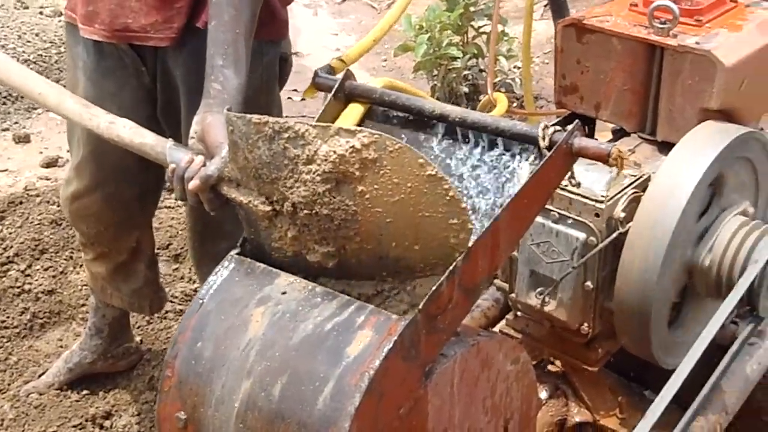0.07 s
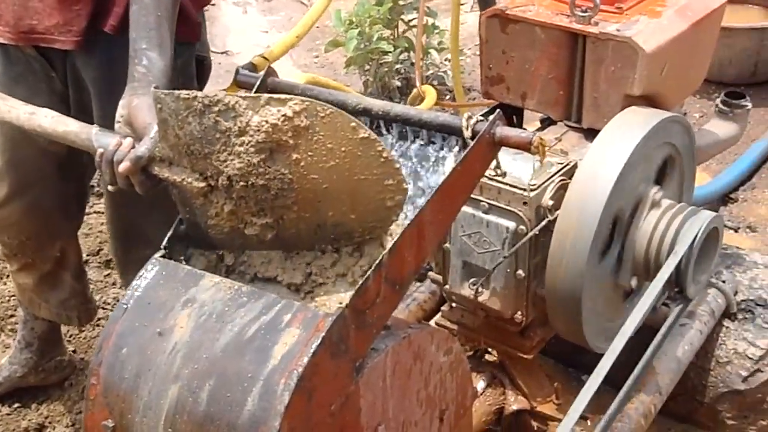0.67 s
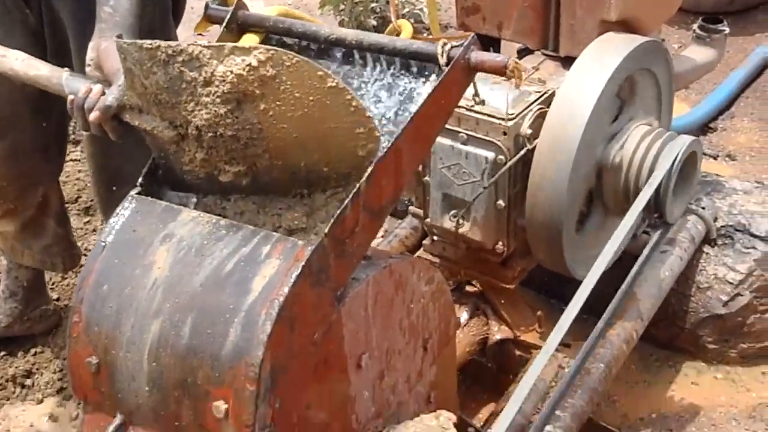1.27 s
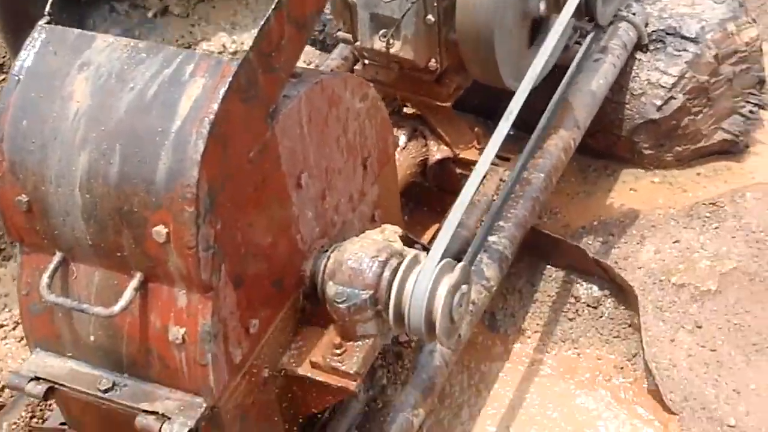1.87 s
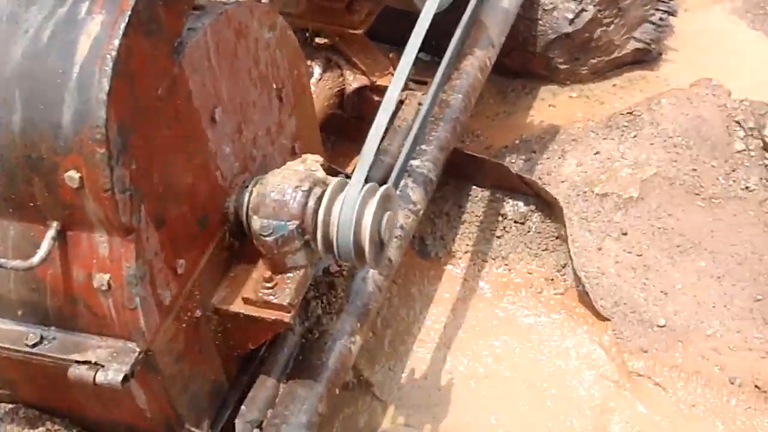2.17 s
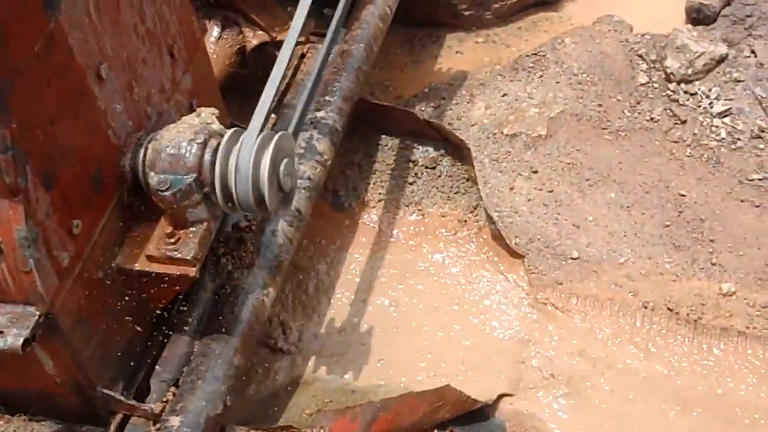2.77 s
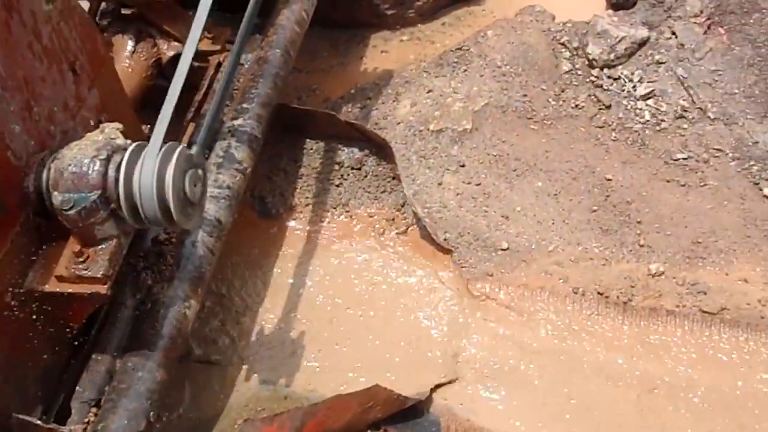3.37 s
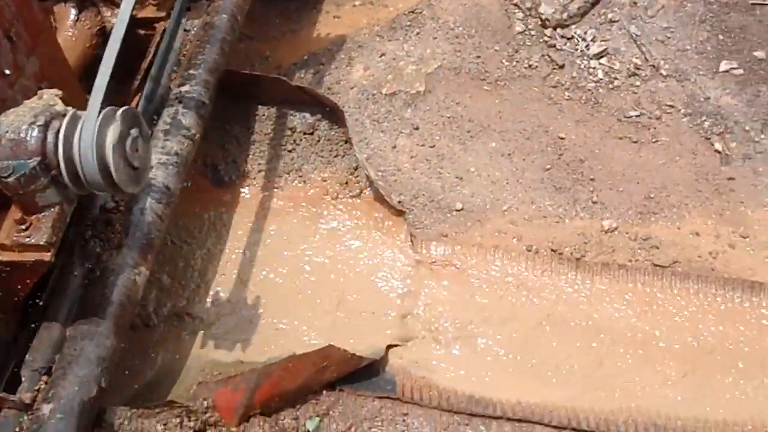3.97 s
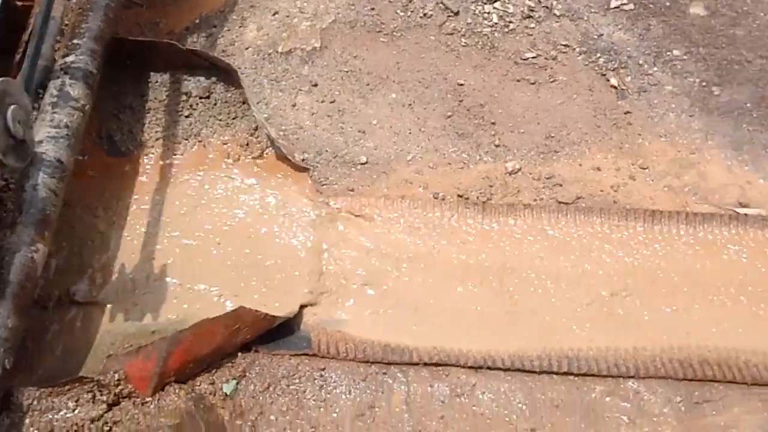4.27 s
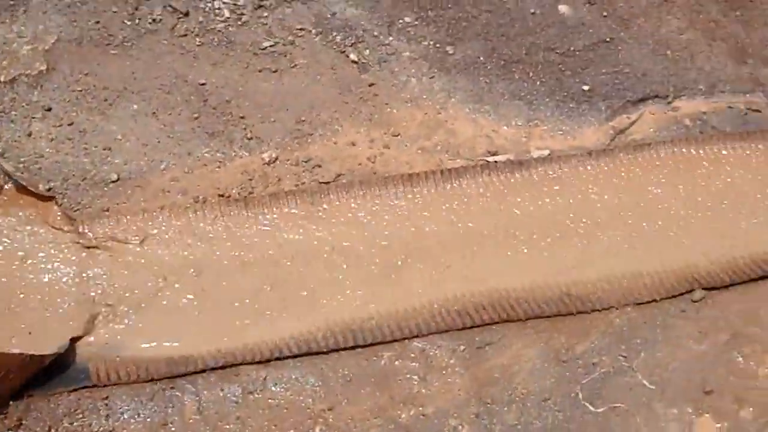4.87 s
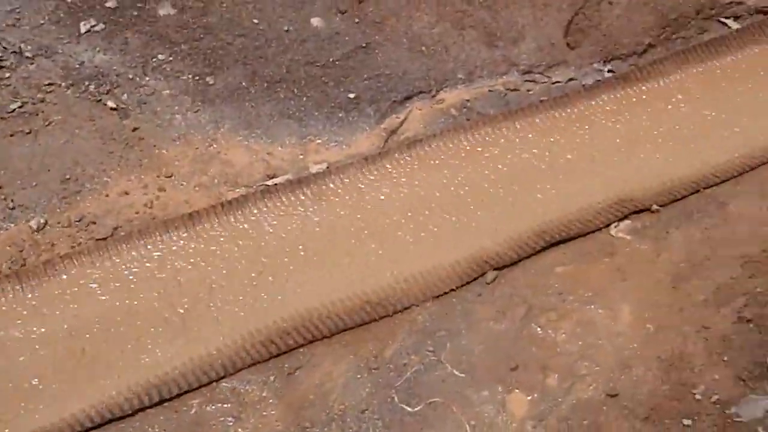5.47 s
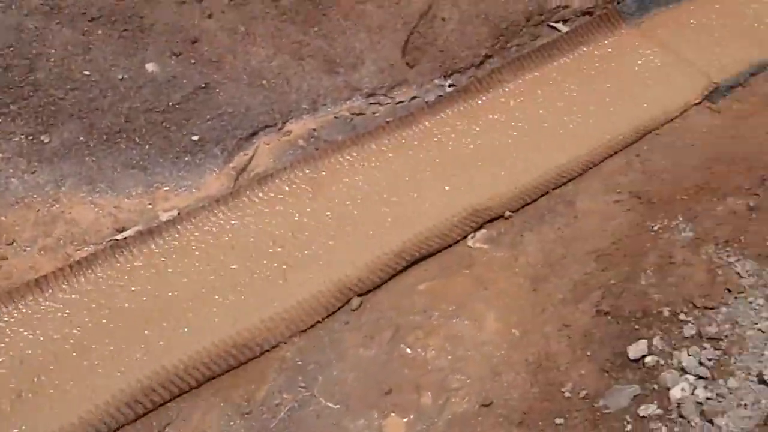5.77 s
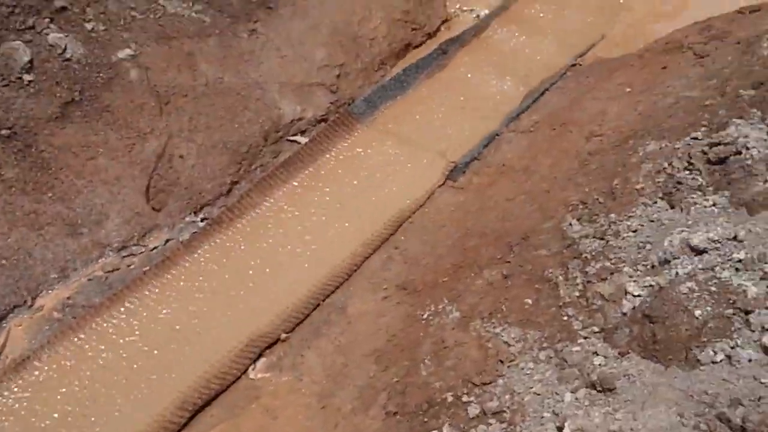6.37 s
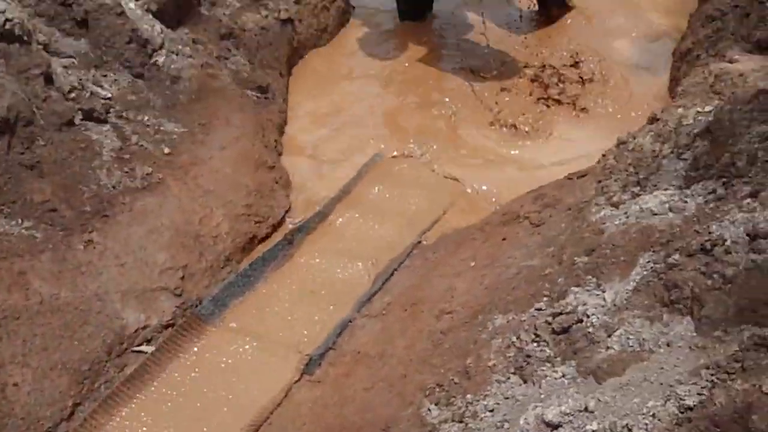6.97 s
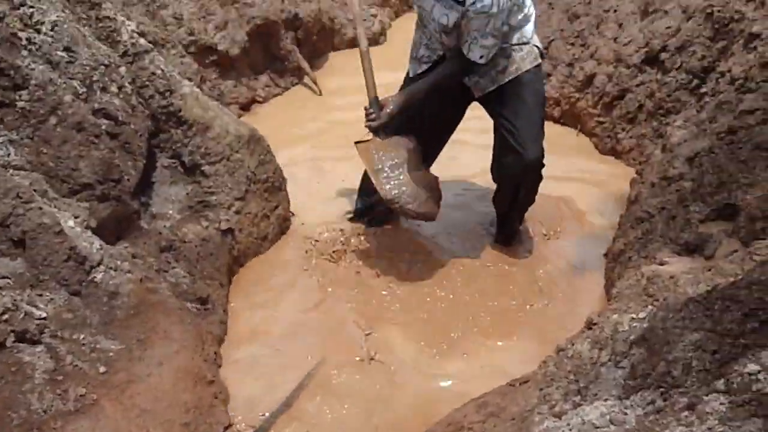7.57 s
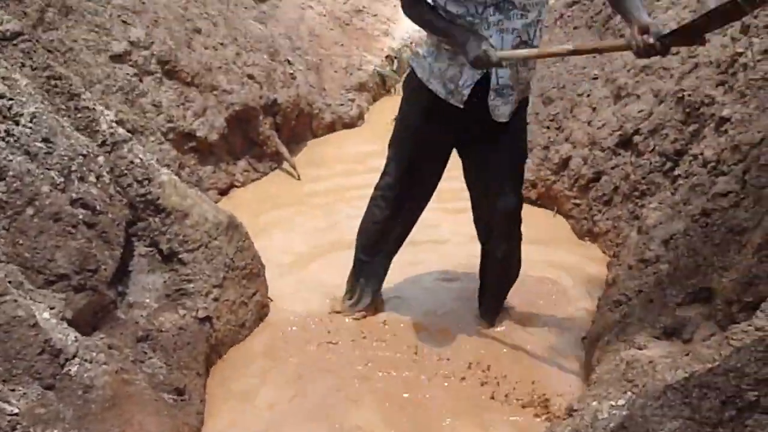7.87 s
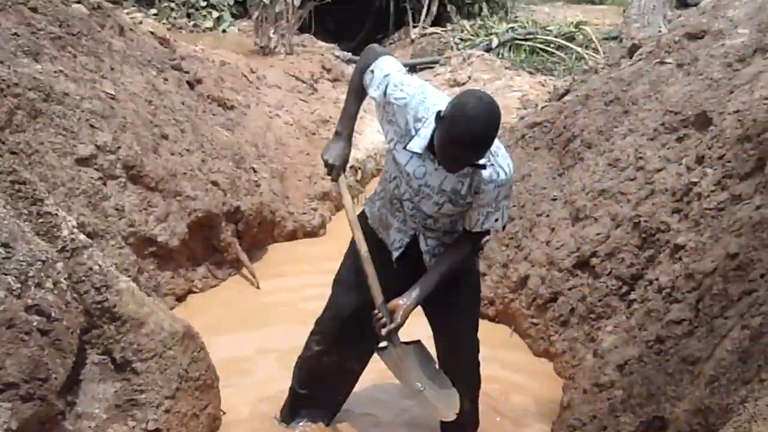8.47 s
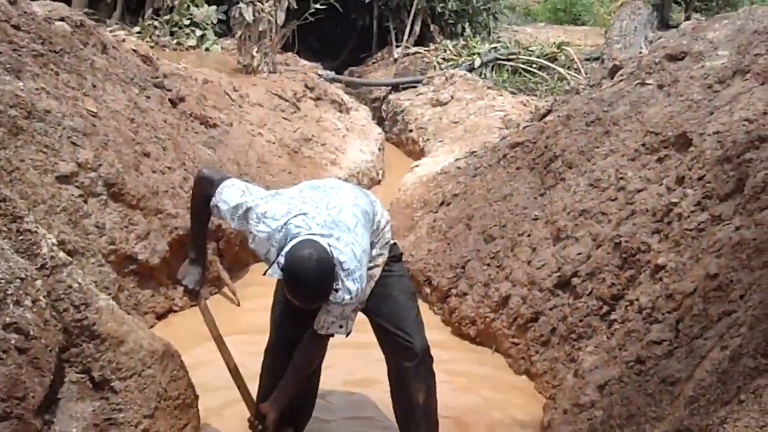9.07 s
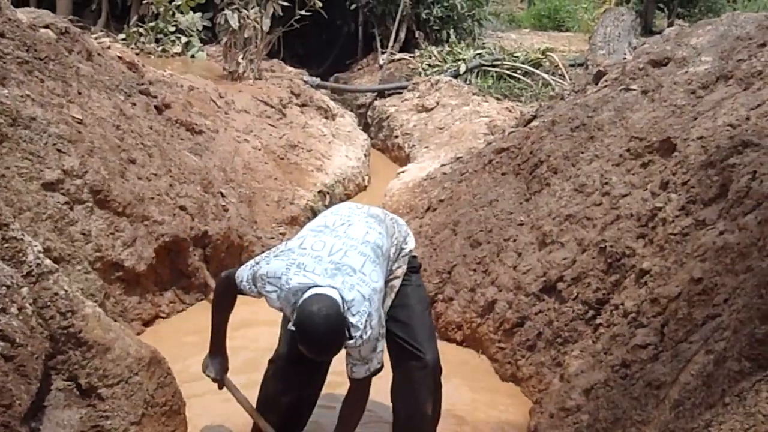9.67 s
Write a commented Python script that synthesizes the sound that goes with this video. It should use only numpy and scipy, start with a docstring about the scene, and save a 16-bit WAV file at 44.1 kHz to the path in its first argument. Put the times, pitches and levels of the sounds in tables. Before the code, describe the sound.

A single-cylinder diesel engine runs loudly from start to finish in an open pit, at about ten firings a second. Each beat combines gear clatter, a metallic knock and an exhaust bark, with some strokes harder or weaker. Underneath, gravel hails on a mill's steel drum with bright pings, a low rumble and a faint rotor hum. Stones crack briefly near 0.7, 3.2 and 4.4 seconds, and wet clods thud dully inside, most clearly around 6.1, 8.1 and 8.6 seconds. The exhaust barks harder near 2.3, 2.9 and 6.2 seconds. From about 5 seconds a faint fizz of muddy water in a sluice comes up, and a hollow boom off the earth banks grows. From about 6.5 seconds the treble fades as the listener turns away, leaving a duller, thumping chug until the end, near 9.7 seconds.

```python
"""An open pit, where a single-cylinder diesel drives a wet hammer mill at about ten firings a second.
Each cycle is a gear clatter, a combustion knock with an injector snap, an exhaust bark and a valve tick.
Under that beat, gravel hails on the mill's steel drum, the rotor hums and slurry fizzes in the sluice.
The listener turns away along the sluice, so the treble dulls and the boom off the earth banks grows."""
import sys
import numpy as np
from scipy import signal
from scipy.fft import rfft, irfft
from scipy.io import wavfile
from scipy.ndimage import uniform_filter1d

SR = 44100
rng = np.random.default_rng(int(sys.argv[2]) if len(sys.argv) > 2 else 0)


def bounce(signal):
    """Save signal as a 16-bit WAV file at the path given by the first command-line argument."""
    frames = np.transpose(np.atleast_2d(signal))
    limited = np.clip(frames, -1, 1)
    pcm = np.round(limited * 32767).astype(np.int16)
    wavfile.write(sys.argv[1], SR, pcm)


N = 429093
TIME = np.arange(N) / SR

# fader for the boom off the earth banks: t/s, level/dB
BOOM_FADER = [(0, -51), (3, -64), (4.8, -46), (5.6, -37), (6.2, -40), (6.7, -31.5), (7.2, -32), (7.8, -33),
              (8.6, -31), (9.2, -29.5), (9.73, -31)]
# dull tone of that boom: f/Hz, relative level/dB
BOOM_EQ = [(60, -26), (200, -20.5), (290, -6), (365, 1.5), (450, 2), (500, -2), (565, -0.5), (625, -8.5),
           (690, -2), (830, -18.5), (1060, -14), (1400, -18), (3000, -34)]
# fader for the slurry in the sluice: t/s, level/dB
SLURRY_FADER = [(0, -66), (2, -56), (4, -61), (5.2, -52), (6.3, -45.5), (7.2, -50), (8, -50), (9.73, -51)]
# airy tone of its bubbles: f/Hz, relative level/dB
SLURRY_EQ = [(1000, -12), (3000, 0), (7000, -6), (9500, 4), (11500, -4), (13000, 3), (14500, -10)]
# hum of the mill's rotor: multiple of its speed, level/dB
ROTOR_HARMONICS = [(1, -63), (2, -55.5)]
# load on the mill, heard as grinding: t/s, level/dB
MILL_LOAD = [(0, -25), (.7, -24), (.98, -27), (1.1, -24), (1.9, -23.5), (2.35, -24), (2.48, -25.5),
             (3.4, -24), (4.2, -26), (4.65, -24.5), (4.95, -30.5), (5.13, -26.5), (5.7, -27), (6.9, -25),
             (8.3, -24), (9.1, -22), (9.73, -23.5)]
# bright tone of gravel on steel: f/Hz, relative level/dB
MILL_EQ = [(150, -11), (700, -12.5), (1100, -7), (2300, -10), (2650, -10.5), (3100, -10), (3900, -5),
           (4550, -2), (5100, -5.5), (5800, -16), (6550, -15.5), (8000, -22), (11200, -30.5), (12800, -29)]
# low rumble of the drum: f/Hz, relative level/dB
RUMBLE_EQ = [(40, -27), (90, -29), (145, -9), (180, -8.5), (260, 0), (310, -1), (380, 3.5), (440, 3),
             (510, -16.5), (575, -4.5), (630, -6), (780, -5.5), (1500, -32)]
# bright drum modes, rung by pebbles: f/Hz, relative level/dB, t60/s
PING_MODES = [(3900, -10, 0.02), (4210, -13, 0.031), (4340, 2.5, 0.019), (4460, -2, 0.04), (4603, 1, 0.034),
              (4720, -0.5, 0.027), (5060, -9, 0.031), (6660, -13, 0.017)]
# low drum modes, rung by clods: f/Hz, level/dB, t60/s
CLOD_MODES = [(392, -8, 0.041), (423, -9, 0.083), (523, -14, 0.022), (760, -30, .03)]
# wet clods dropping into the drum: t/s, level/dB
CLOD_HITS = [(0.638, -18), (2.887, -22), (6.114, -16), (8.127, -12.5), (8.59, -14)]
# larger stones shattering in the drum: t/s, level/dB
STONE_HITS = [(0.7163, -20), (3.195, -23), (4.3505, -22.5), (8.592, -26)]
# engine speed, held by the governor: t/s, firing rate/Hz
ENGINE_SPEED = [(0.0, 9.857), (1.0, 9.828), (1.8, 9.858), (2.4, 9.957), (2.9, 9.966), (3.6, 9.983),
                (4.2, 9.916), (4.6, 9.976), (5.2, 9.96), (6.0, 9.89), (6.5, 9.884), (7.0, 9.891),
                (7.5, 9.898), (8.4, 9.883), (9.2, 9.852), (9.73, 10.009)]
# tone of the exhaust's gas puff: f/Hz, relative level/dB
PUFF_EQ = [(200, -8), (600, -9.5), (1050, -19), (1400, -9), (2000, -5.5), (3000, -6), (4500, 4.5),
           (5600, -9), (6600, -8), (9000, -28), (14000, -35)]
# hollow ring of the silencer: f/Hz, level/dB, t60/s
SILENCER_MODES = [(354, 2.5, 0.091), (562, -5, 0.11), (956, 3.5, .08), (1034, 2.5, 0.035),
                  (1050, -3, 0.045)]
# strokes where the exhaust barks out: t/s, accent/dB
BARK_ACCENTS = [(2.27, 7), (2.87, 9), (6.19, 10.5), (6.49, 7), (7.3, 5.5), (8.11, 4), (8.61, 3)]
# tone of the gear clatter: f/Hz, relative level/dB
CLATTER_EQ = [(200, -26), (550, -6.5), (790, -0.5), (1300, -10), (1700, -3.5), (2400, -5.5), (3400, -4),
              (4450, 5.5), (5100, -3), (5800, -14.5), (6600, -17), (9000, -26), (14000, -51)]
# ring of the gears: f/Hz, level/dB, t60/s
GEAR_MODES = [(777, -32, 0.051), (1045, -28.5, 0.025), (1635, -32, 0.057)]
# strokes where the gears rattle hard: t/s, accent/dB
CLATTER_ACCENTS = [(.34, 5.5), (.75, 4), (2.27, 6), (2.37, 5), (3.07, 5.5), (3.17, 5), (3.47, 3), (4.58, 4),
                   (4.98, 5), (5.48, 4.5), (6.09, 3), (7.1, 2.5), (7.7, 4)]
# metallic tone of the knock: f/Hz, relative level/dB
KNOCK_EQ = [(150, -20.5), (450, -7.5), (750, -15), (1200, -5), (1550, -12.5), (2050, -5), (2450, -6.5),
            (3400, -7), (4500, 1), (5700, -12.5), (6600, -8), (8200, -20), (11000, -39.5), (13000, -27)]
# thud of the engine block: f/Hz, level/dB, t60/s
BLOCK_MODES = [(260, -41, 0.082), (385, -26.5, 0.026), (444, -35, 0.065), (469, -26, 0.028),
               (704, -53, 0.033), (1190, -42, 0.12), (2072, -36, 0.087)]
# low shove of the frame: f/Hz, level/dB, t60/s
FRAME_MODES = [(61.3, -42.5, 0.093), (109, -34.5, 0.08)]
# firings that slam or nearly miss: t/s, accent/dB
KNOCK_ACCENTS = [(.03, -2.5), (.14, -9), (.24, 2.5), (.34, 3), (2.27, 3), (2.37, 2), (2.57, -3),
                 (2.77, -11), (2.97, -5), (3.27, -10), (3.47, 3.5), (3.57, -13), (4.17, 2.5), (4.47, -8),
                 (4.68, -15), (4.98, -8), (5.08, 0.5), (5.28, -12), (5.89, -10), (6.39, 2.5), (7.1, 3),
                 (7.2, -9), (7.6, -11), (7.7, -8), (8.51, 4), (8.61, -6), (8.72, 3), (8.82, 2.5),
                 (9.02, -7), (9.32, 4.5)]
# perspective as the listener turns: t/s, treble/dB, thump/dB (also lifts the bark), drum/dB
PERSPECTIVE = [(0, 2, -6.5, -1.5), (2, 3.5, -10, 1), (3.5, 3.5, -2, 0), (4.5, 5, -4, -0.5),
               (5.5, 5, -2, -1), (6.4, 3.5, 2, -2), (7.5, -5.5, 5, -16), (9.73, -31, 6, -12)]

FIRST_FIRING_S, FIRING_JITTER_S = .0346, .0004
# how hard a usual stroke hits, its scatter, and the dB it gains per dB of load or thump
KNOCK_DB, KNOCK_SCATTER_DB, KNOCK_PER_LOAD = -17, 1.13, .2
CLATTER_DB, CLATTER_SCATTER_DB, CLATTER_PER_LOAD = -23.5, 1.4, 0.55
BARK_DB, BARK_SCATTER_DB, BARK_PER_THUMP = -28.5, 1.4, 0.45
BARK_LAG_S, BARK_BUILD_CYCLES = .0192, 2.196  # the silencer's low modes speak later
SURGE_DB, SURGES_PER_S = 1.0, 8  # the gravel tumbles unevenly
ROTOR_TURNS_PER_FIRING = 5.75
CUTOFF_HZ = 14250


def from_db(db):
    """Decibels to gain."""
    return 10 ** (np.asarray(db) / 20)


def unit_power(x):
    """Normalise to an RMS of 1."""
    return x / np.sqrt(np.mean(x ** 2) + 1e-20)


def automation(rows):
    """One curve per value column of a timed table, sample by sample."""
    times, *columns = np.transpose(rows)
    return [np.interp(TIME, times, column) for column in columns]


def drift(rate):
    """Random wander of unit power, gliding to `rate` new values a second."""
    knots = rng.standard_normal(N // 20)
    return unit_power(np.interp(TIME * rate, np.arange(len(knots)), knots))


def eq(x, curve):
    """Minimum-phase EQ: no pre-ring, and white noise keeps its power."""
    size = 4096
    hz, db = np.transpose(curve)
    grid_hz = np.maximum(np.arange(size // 2 + 1) * SR / size, 1)
    gain = from_db(np.interp(np.log(grid_hz), np.log(hz), db))
    cepstrum = irfft(np.log(gain))
    response = irfft(np.exp(rfft(2 * cepstrum[:size // 2], size)))
    return signal.oaconvolve(x, response / np.linalg.norm(response))[:N]


def butterworth(x, hz, kind, order):
    """High-, low- or band-pass."""
    return signal.sosfilt(signal.butter(order, hz, kind, fs=SR, output="sos"), x)


def resonance(x, hz, width_hz):
    """One resonant band, unity gain at its peak."""
    return signal.lfilter(*signal.iirpeak(hz, hz / width_hz, fs=SR), x)


def clicks(times, db):
    """One impulse per event."""
    out = np.zeros(N)
    inside = (times >= 0) & (times < TIME[-1])
    out[(times[inside] * SR).astype(int)] = from_db(db)[inside]
    return out


def bursts(times, db, rise, hold, decay):
    """A rise-hold-decay envelope on every event, timed in seconds."""
    t = TIME[:SR // 8]
    shape = np.minimum(t / rise, 1) * np.exp(-np.maximum(t - rise - hold, 0) / decay)
    return signal.oaconvolve(clicks(times, db), shape)[:N]


def grit(per_s, spread_db):
    """A hail of tiny impacts of uneven size; unit power."""
    size = from_db(spread_db * np.clip(rng.standard_normal(N), -2, 2))
    polarity = rng.choice([-1, 1], N)
    return unit_power(size * polarity * (rng.random(N) < per_s / SR))


def strike(times, db, modes, vary_db, jitter_s):
    """Each blow rings every mode with a strength and a tiny lag of its own."""
    out = np.zeros(N)
    for hz, level_db, t60 in modes:
        size, lag = rng.standard_normal((len(times), 2)).T
        blows = clicks(times + jitter_s * lag, db + level_db + vary_db * size)
        radius, angle = from_db(-60 / (t60 * SR)), 2 * np.pi * hz / SR
        feedback = [1, -2 * radius * np.cos(angle), radius ** 2]
        out += signal.lfilter([0, np.sin(angle)], feedback, blows + 1e-18)
    return out


def firing_times():
    """The beat: one firing per engine cycle, each a hair early or late."""
    firing_hz, = automation(ENGINE_SPEED)
    cycles = np.cumsum(firing_hz) / SR
    cycles -= np.interp(FIRST_FIRING_S, TIME, cycles)
    fired = np.interp(np.arange(int(cycles[-1]) + 1), cycles, TIME)
    return fired + FIRING_JITTER_S * rng.standard_normal(len(fired))


def dynamics(fired, usual_db, scatter_db, accents):
    """Level of every stroke: the usual one, some scatter, and accents on the nearest firing."""
    db = usual_db + scatter_db * np.clip(rng.standard_normal(len(fired)), -2, 2)
    for time, accent_db in accents:
        db[np.argmin(np.abs(fired - time))] += accent_db
    return db


def earth_banks(fired):
    """The banks throw back every firing with the same dull tail, over a diffuse wash."""
    t = TIME[:SR // 4]
    tail = rng.standard_normal(len(t)) * np.exp(-t / 0.047)
    echoes = signal.oaconvolve(clicks(fired - .003, np.zeros(len(fired))), tail)[:N]
    wash = eq(rng.standard_normal(N), BOOM_EQ)
    return from_db(-4.0) * unit_power(eq(echoes, BOOM_EQ)) + from_db(-0.1) * wash


def slurry():
    """Tiny bubbles burst on the muddy water, in fizzy flurries."""
    fizz_db, = automation(SLURRY_FADER)
    flurries = from_db(fizz_db + 4.1 * drift(rate=180))
    return flurries * eq(grit(per_s=5600, spread_db=6), SLURRY_EQ)


def rotor(fired):
    """The unbalanced rotor hums in step with the engine, its belt slipping a little."""
    firing_hz = np.interp(TIME, fired[1:], uniform_filter1d(1 / np.diff(fired), size=8))
    slip = 1 + 0.005 * drift(rate=3.08)
    phase = 2 * np.pi * np.cumsum(ROTOR_TURNS_PER_FIRING * firing_hz * slip) / SR
    return sum(from_db(db) * np.sqrt(2) * np.sin(k * phase) for k, db in ROTOR_HARMONICS)


def pebbles(per_s, spread_db):
    """Single pebbles flung at the drum, each pinging one of its bright modes; unit power."""
    out = np.zeros(N)
    for mode in PING_MODES:
        times = TIME[rng.random(N) < per_s / len(PING_MODES) / SR]
        out += strike(times, 0, [mode], spread_db, jitter_s=0)
    return unit_power(out)


def stones():
    """Hard stones shatter in a bright crash."""
    crash = bursts(*np.transpose(STONE_HITS), rise=.001, hold=.0041, decay=.007)
    return eq(crash * grit(per_s=4000, spread_db=2.5), MILL_EQ)


def clods():
    """Soft clods ring only the drum's low modes."""
    thunk = strike(*np.transpose(CLOD_HITS), CLOD_MODES, vary_db=5.0, jitter_s=.0001)
    return from_db(0.5) * butterworth(thunk, hz=[240, 800], kind="band", order=2)


def mill(fired, grind_db, drum_db):
    """Gravel hails on the steel drum, which rings and rumbles; the engine's valve tick shares its EQ."""
    tick_db = rng.normal(-34.5, 1.8, len(fired))
    tick = bursts(fired + .0516, tick_db, rise=.0013, hold=.0025, decay=.0071)
    gravel = from_db(grind_db - 4.0 + 2.34 * drift(rate=90)) * grit(per_s=5000, spread_db=2.0)
    hail = eq(gravel + tick * grit(per_s=3600, spread_db=1.5), MILL_EQ)
    pings = from_db(grind_db - 7.5) * pebbles(per_s=200, spread_db=2)
    # the shell's own ring and rumble carry only close to the drum
    shell = from_db(2.5) * resonance(hail, hz=2670, width_hz=104)
    shell += from_db(-7.5) * resonance(hail, hz=6470, width_hz=150)
    rumble = from_db(-35.0) * eq(rng.standard_normal(N), RUMBLE_EQ)
    return hail + pings + stones() + clods() + from_db(drum_db) * (shell + rumble)


def injector(fired, knock_db):
    """The injector needle snaps at each firing, a thin tick on top of the knock."""
    snap = bursts(fired - .0035, 0.59 * knock_db - 22.5, rise=.0024, hold=.0031, decay=.0012)
    return butterworth(snap * grit(per_s=6000, spread_db=3.5), hz=7500, kind="high", order=2)


def exhaust(fired, bark_db):
    """The valve opens late in the power stroke: a puff of gas, and the silencer rings."""
    puff_db = rng.normal(-27.0, 0.96, len(fired))
    puff = bursts(fired + .016, puff_db, rise=.005, hold=.0045, decay=.009)
    # the silencer's volume evens out the pressure from stroke to stroke
    evened_db = .5 * (bark_db + uniform_filter1d(bark_db, size=5))
    bark = np.zeros(N)
    for hz, db, t60 in SILENCER_MODES:
        onsets = fired + BARK_LAG_S + BARK_BUILD_CYCLES / hz
        bark += strike(onsets, evened_db, [(hz, db, t60)], vary_db=0.64, jitter_s=.0003)
    gas = eq(puff * rng.standard_normal(N), PUFF_EQ)
    return gas + butterworth(bark, hz=220, kind="high", order=2)


def gears(fired, clatter_db):
    """Compression slows the flywheel, and the gear teeth rattle through their slack."""
    onsets = fired - .029 + rng.normal(0, .0004, len(fired))
    rattle = bursts(onsets, clatter_db - 0.8, rise=.0014, hold=.008, decay=.021)
    clacks = from_db(2.2 * drift(rate=320))  # the teeth meet unevenly, milliseconds apart
    ring = strike(fired - .0235, 0, GEAR_MODES, vary_db=1.5, jitter_s=.00027)
    return eq(rattle * clacks * grit(per_s=6000, spread_db=0.5), CLATTER_EQ) + ring


def knock(fired, knock_db, thump_db):
    """Combustion slams the piston: a short metal crash, a thud in the block, a soft shove of the frame."""
    crash = bursts(fired - .004, knock_db - .5, rise=.0028, hold=.0015, decay=.0047)
    thud = strike(fired - .004, thump_db, BLOCK_MODES, vary_db=2.5, jitter_s=.0002)
    thud = butterworth(thud, hz=260, kind="high", order=3)
    shove = strike(fired - .010, 0.6 * thump_db, FRAME_MODES, vary_db=0.5, jitter_s=.00015)
    shove = butterworth(shove, hz=150, kind="low", order=2)
    metal = eq(crash * grit(per_s=6000, spread_db=1.0), KNOCK_EQ)
    return metal + thud + shove


def scene():
    """The mono mix: engine and mill up front, the sluice and the boom of the pit behind."""
    fired = firing_times()
    treble_db, thump_curve_db, drum_db = automation(PERSPECTIVE)
    load_db, = automation(MILL_LOAD)
    boom_db, = automation(BOOM_FADER)
    # load makes the engine knock and rattle harder; the bark grows as the listener comes round to it
    strain_db = np.interp(fired, TIME, load_db - load_db.mean())
    thump_db = np.interp(fired, TIME, thump_curve_db)
    knock_db = dynamics(fired, KNOCK_DB + KNOCK_PER_LOAD * strain_db, KNOCK_SCATTER_DB, KNOCK_ACCENTS)
    clatter_db = dynamics(fired, CLATTER_DB + CLATTER_PER_LOAD * strain_db,
                          CLATTER_SCATTER_DB, CLATTER_ACCENTS)
    bark_db = dynamics(fired, BARK_DB + BARK_PER_THUMP * thump_db, BARK_SCATTER_DB, BARK_ACCENTS)
    grind_db = load_db + SURGE_DB * drift(rate=SURGES_PER_S)
    engine = knock(fired, knock_db, thump_db) + gears(fired, clatter_db)
    # the crankcase's hard midrange comes forward together with the boom
    engine += from_db(boom_db + 25.0) * resonance(engine, hz=1900, width_hz=460)
    machine = engine + exhaust(fired, bark_db) + mill(fired, grind_db, drum_db)
    # a high shelf shades the top end as the listener turns
    body = butterworth(machine, hz=5500, kind="low", order=1)
    treble = from_db(treble_db) * (machine - body)
    boom = from_db(boom_db) * earth_banks(fired)
    return (body + treble + injector(fired, knock_db) + slurry() + boom + rotor(fired))[None]


def record(dry):
    """The microphone chain: deep bass rolled off, peaks rounded, a steep cut at the top."""
    thin = butterworth(dry, hz=50, kind="high", order=6)
    rounded = 0.89 * np.tanh(thin / 0.92)
    return signal.sosfilt(signal.ellip(12, .1, 100, CUTOFF_HZ, fs=SR, output="sos"), rounded)


dry = scene()
out = record(dry)
bounce(out)
```